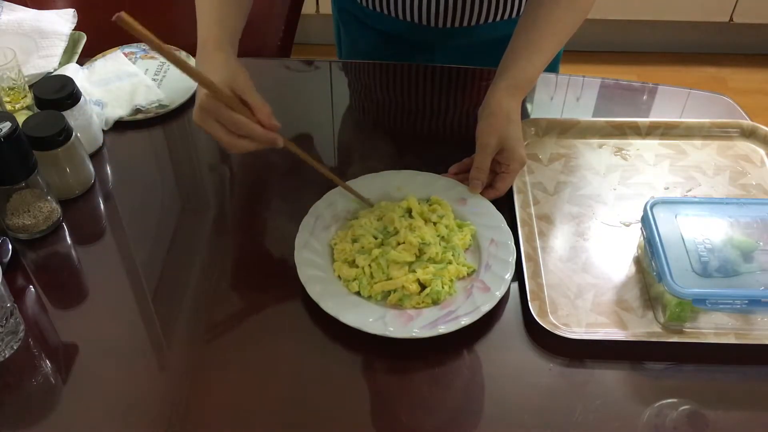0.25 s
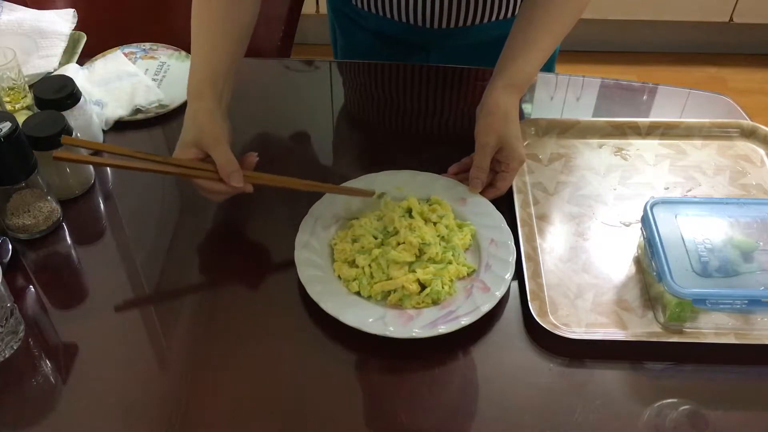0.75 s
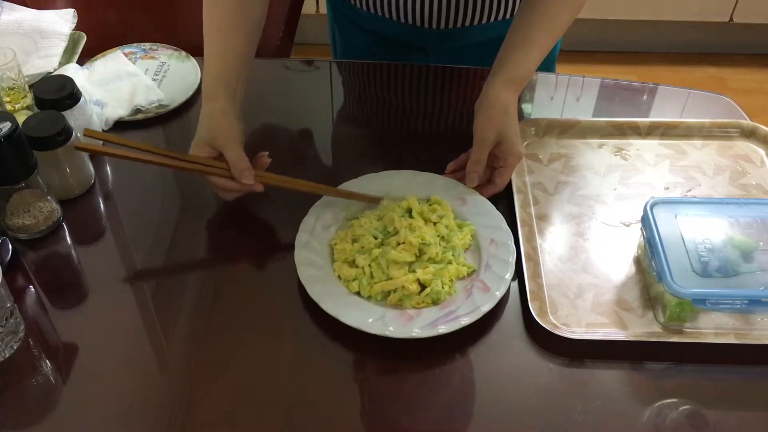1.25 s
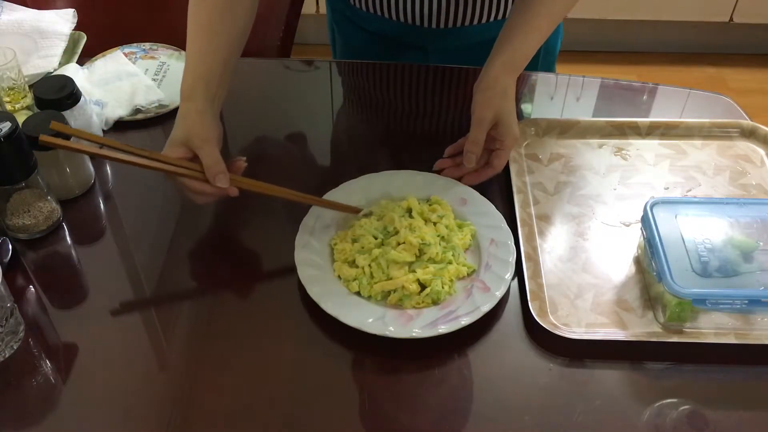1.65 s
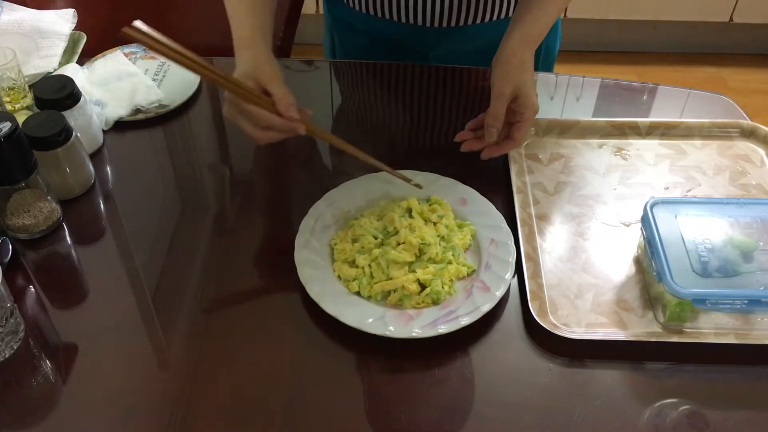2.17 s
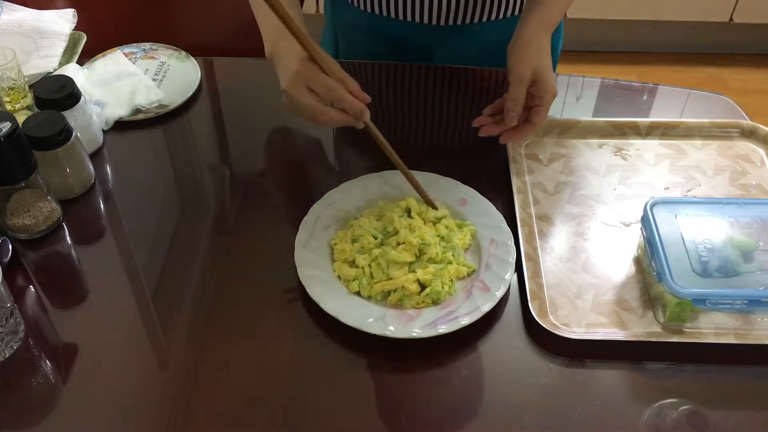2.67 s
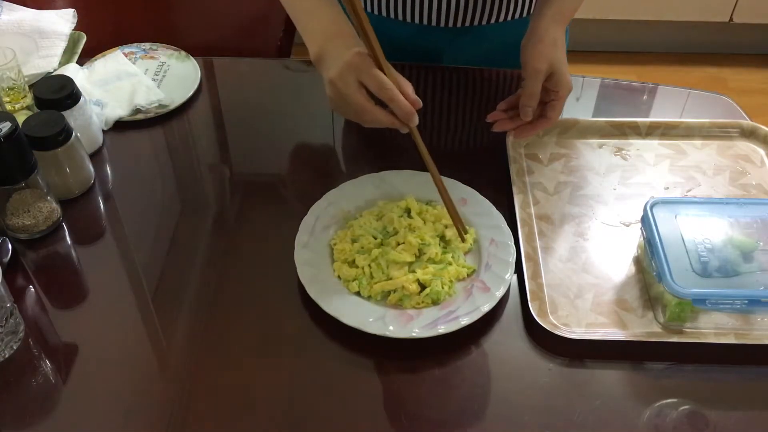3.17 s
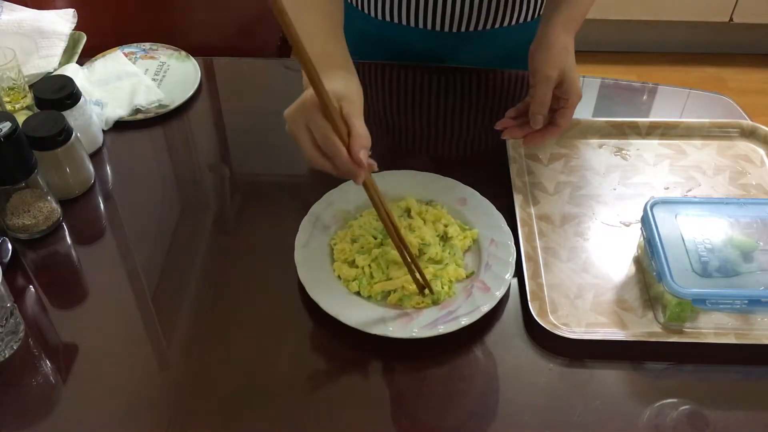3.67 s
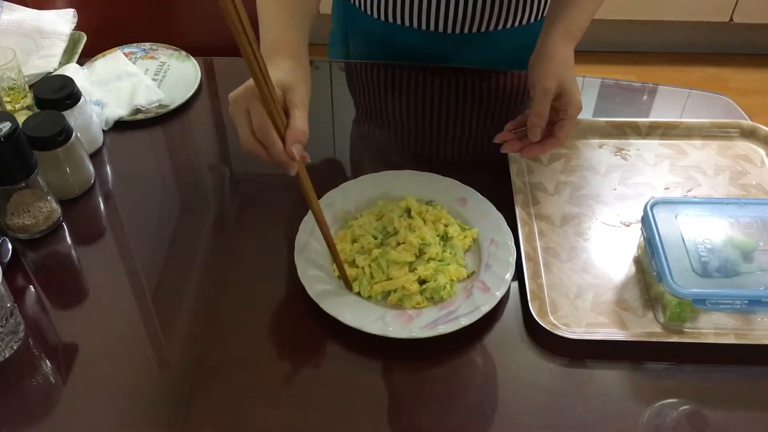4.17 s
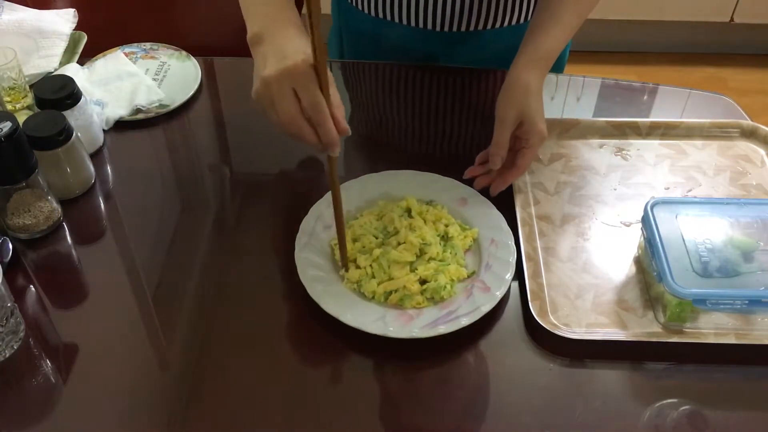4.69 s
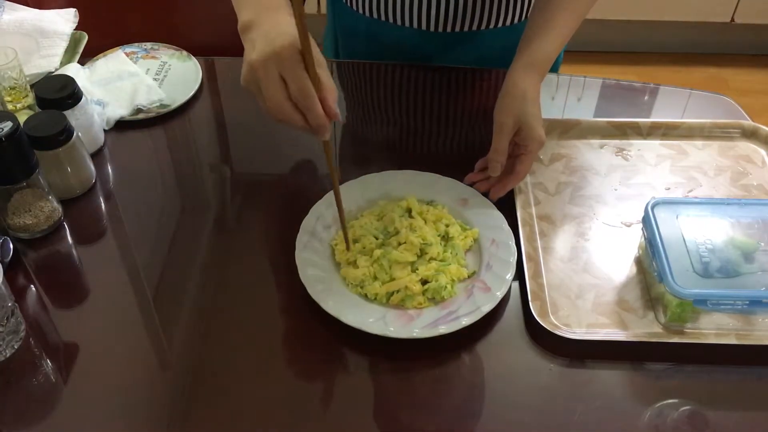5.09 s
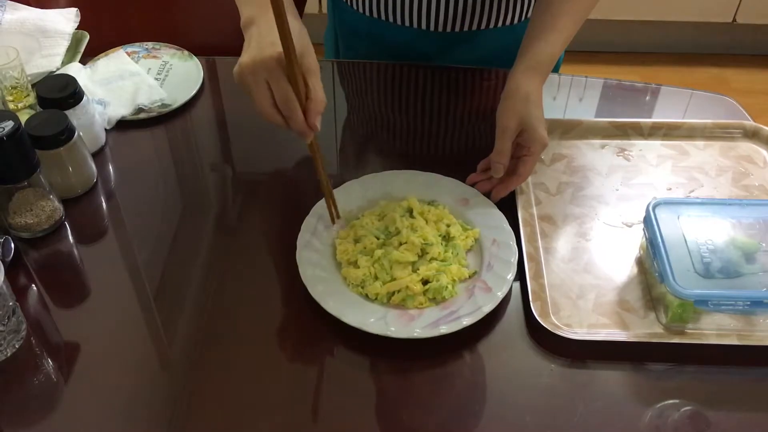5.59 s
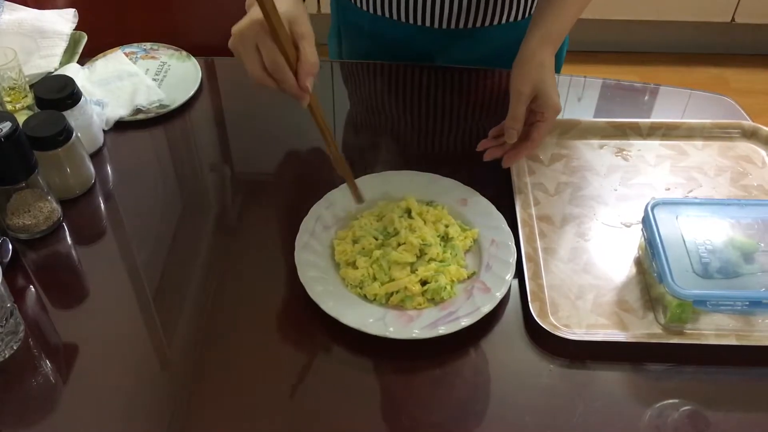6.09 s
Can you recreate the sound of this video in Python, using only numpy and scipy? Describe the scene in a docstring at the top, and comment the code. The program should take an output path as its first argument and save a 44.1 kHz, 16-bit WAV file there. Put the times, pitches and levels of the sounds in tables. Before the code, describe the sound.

Wooden chopsticks tap a ceramic plate of scrambled egg in sharp, briefly ringing clicks, over soft hiss, room air and low appliance hum.

```python
"""Over room air and a low appliance hum, scrambled egg hisses on a ceramic plate: filtered noise and sines.
The gain starts reduced, so this background first creeps up. Wooden chopsticks then push the egg together:
each push swells the hiss slightly and ends in a tap, whose damped modes ring the plate, knock it on the
table and sound the stick, with a filtered-noise click. Ticks fall between, and a small hard room answers.
Loud taps make the recorder's gain drop at once, then recover exponentially."""
import sys
import numpy as np
from scipy import signal
from scipy.fft import rfft, irfft, next_fast_len
from scipy.io import wavfile
from scipy.ndimage import uniform_filter1d, map_coordinates

SR = 44100
rng = np.random.default_rng(int(sys.argv[2]) if len(sys.argv) > 2 else 0)


def store_pcm(level_fs):
    """Save levels as 16-bit WAV."""
    pcm = np.round(np.clip(level_fs, -1, 1) * 32767).astype(np.int16)
    wavfile.write(sys.argv[1], SR, np.atleast_2d(pcm).T)


N = 279838
T = np.arange(SR // 2) / SR  # time since a contact [s]


def amp(db):
    """Logarithmic level: decibels to an amplitude factor."""
    return 10 ** (np.asarray(db) / 20)


def unit(x):
    """Effective value: scale to rms 1."""
    return x / np.sqrt(np.mean(x ** 2) + 1e-20)


def blow(x):
    """Onset level: scale a hit to rms 1 over its first 12 ms."""
    onset = x[:int(0.012 * SR)]
    return x / np.sqrt(np.mean(onset ** 2) + 1e-20)


def along(points, hz):
    """Logarithmic frequency: interpolate (frequency [Hz], value) points on a log axis."""
    point_hz, values = np.transpose(points)
    return np.interp(np.log(hz + 1), np.log(point_hz), values)


def wobble(rate):
    """Slow random modulation: a smooth curve through rate random knots a second."""
    knots = rng.standard_normal(int(N * rate / SR) + 4)
    return map_coordinates(knots, [np.arange(N) * rate / SR])


def filtered(x, response):
    """Linear filtering: multiply the spectrum of x by a response of frequency."""
    size = next_fast_len(len(x) + 8192)
    spectrum = rfft(x, size) * response(np.fft.rfftfreq(size, 1 / SR))
    return irfft(spectrum, size)[:len(x)]


def resonance(f, hz, width):
    """Driven oscillator: causal response of one resonance, with its width in Hz."""
    return 1j * f * width / (hz * hz - f * f + 1j * f * width)


def add(track, s, x):
    """Superposition: mix x into the track at time s."""
    start = round(s * SR)
    track[start:start + len(x)] += x[:N - start]


def burst(t60):
    """Transient excitation: the rough force of a contact, as exponentially decaying noise."""
    return rng.standard_normal(len(T)) * amp(-60 * T / t60)


def puff(hz, width_share, t60):
    """Resonant filtering: a brief noisy snap around one pitch."""
    return blow(filtered(burst(t60), lambda f: resonance(f, hz, hz * width_share) ** 2))


def ring(modes, scatter_db=3.0, attack=0.00057):
    """Modal superposition: damped sines (Hz, dB, t60 s), struck at new strengths and phases each time."""
    x = np.zeros(len(T))
    for hz, db, t60 in modes:
        decay = amp(db + scatter_db * rng.standard_normal() - 60 * T / t60)
        x += decay * np.sin(2 * np.pi * (hz * T + rng.random()))
    return blow(x * (1 - np.exp(-T / attack)))


# Reverberation time of the small hard room: (frequency [Hz], t60 [s])
REVERB_T60 = [(150, 0.1), (600, 0.26), (2000, 0.26), (5000, 0.17), (14000, 0.26)]
# Relative colour of the room's answer: (frequency [Hz], level [dB])
REVERB_COLOUR = [(150, -3), (600, 14), (2000, 3.5), (5000, 6), (14000, 0.5)]


def in_room(x, wet_db, gap=0.0012):
    """Reverberation: convolve with decaying noise, drawn anew for each sound, that builds over gap seconds."""
    hz, t, noise = signal.stft(rng.standard_normal(len(T)), SR, nperseg=256)
    decay_db = -60 * t / along(REVERB_T60, hz)[:, None]
    envelope = amp(along(REVERB_COLOUR, hz)[:, None] + decay_db)
    tail = signal.istft(noise * envelope, SR, nperseg=256)[1][:len(T)]
    tail = tail * (1 - np.exp(-(T / gap) ** 2))
    tail /= np.linalg.norm(tail)
    return x + amp(wet_db) * signal.fftconvolve(x, tail)[:len(x)]


# Relative spectrum of the room air: (frequency [Hz], density [dB per Hz])
AIR_SPECTRUM = [(12, -52), (20, -5), (27, -24), (55, -12), (130, -9.5), (172, 4.5), (210, -3.5), (277, 1.5),
                (499, -6.5), (590, -3.5), (780, -7.5), (2460, -20.5), (6910, -21.5), (13500, -26.5),
                (16000, -37)]
# Partials of the appliance, before HUM_DB and the wobble: (frequency [Hz], level [dB rms])
HUM_PARTIALS = [(59.2, -70.5), (107.7, -72), (183.0, -76.5), (236.9, -65.5), (532.9, -68.5), (592.2, -64.5)]
AIR_DB, HUM_DB = -52.5, 1  # rms level of the air; gain on all hum partials


def kitchen():
    """Stationary noise plus line spectrum: steady room air and an appliance hum wavering in level and phase."""
    air = unit(filtered(rng.standard_normal(N), lambda f: amp(along(AIR_SPECTRUM, f))))
    t = np.arange(N) / SR
    hum = np.zeros(N)
    for hz, db in HUM_PARTIALS:
        level = amp(db + 0.94 * wobble(4.0)) * np.sqrt(2)  # rms to peak
        hum += level * np.sin(2 * np.pi * hz * t + 0.5 * wobble(5))
    return amp(AIR_DB) * air + amp(HUM_DB) * hum


# Chopstick tips meeting the plate: (time [s], strength [dB], click level [dB], spot on the plate)
TIP_TAPS = [(0.2453, -30.5, -25.5, "edge"), (1.027, -25, -32, "back"), (1.2681, -25, -28.5, "back"),
            (1.547, -33.5, -44, "back"), (2.4052, -27.5, -25, "back right"),
            (2.7082, -33, -43.5, "back right"), (3.094, -33.5, -45, "side"), (3.4407, -25, -46, "side"),
            (3.4541, -31.5, -16.5, "edge"), (3.8543, -31, -42, "front"), (4.282, -44, -53, "side"),
            (4.648, -19.5, -62, "left"), (4.9296, -18, -55, "left"), (5.3556, -26.5, -48, "side"),
            (5.695, -22.5, -62, "back left"), (5.999, -23, -40.5, "back left"),
            (6.322, -39.5, -38, "right")]
# Relative spectrum of the egg's hiss: (frequency [Hz], density [dB per Hz])
EGG_SPECTRUM = [(1200, -10), (2500, -1.5), (4500, -3.5), (7500, -8.5), (12000, -11.5), (16000, -16)]
# Clear ticks of the tips against each other and the egg: (time [s], level [dB], pitch [Hz])
CLEAR_TICKS = [(0.7628, -58.5, 8500), (0.9063, -55.5, 4200), (1.741, -50.5, 6500), (2.033, -57, 1960),
               (2.9058, -52.5, 7640), (3.074, -45.5, 6860), (3.48, -38, 6260), (4.0082, -58.5, 5960),
               (4.624, -56.5, 4970), (4.7018, -46.5, 6700)]
EGG_DB, PUSH_DB = -63, 0.5  # mean hiss level between pushes; its swell during one
PUSH_LEAD_S, PUSH_WIDTH_S = 0.1, 0.092  # a push peaks this long before its tap; its half-width at 1/e
WET_TICK_DB, WET_TICK_RANGE_DB = -0.5, 4.5  # faintest wet tick against the hiss; how much louder one can be


def egg(count=40):
    """Modulated noise: hiss swelling in each push, with clear ticks and many tiny wet ones as noise bursts."""
    hiss = unit(filtered(rng.standard_normal(N), lambda f: amp(along(EGG_SPECTRUM, f))))
    t = np.arange(N) / SR
    pushes = [np.exp(-((t - s + PUSH_LEAD_S) / PUSH_WIDTH_S) ** 2) for s, *_ in TIP_TAPS]
    push = np.max(pushes, axis=0)
    level_db = EGG_DB + PUSH_DB * push + 0.8 * wobble(6.95)
    out = amp(level_db + 0.74 * wobble(28)) * hiss
    for s, db, hz in CLEAR_TICKS:
        tick = puff(hz, width_share=0.35, t60=0.0061)
        add(out, s, amp(db) * in_room(tick, wet_db=-10))
    for when, size, pitch in rng.random((count, 3)):
        db = level_db[int(when * N)] + WET_TICK_DB + WET_TICK_RANGE_DB * size ** 2
        wet_tick = puff(3000 * 2.8 ** pitch, width_share=0.45, t60=0.0084)
        add(out, when * (N - 1) / SR, amp(db) * wet_tick)
    return out


# Main modes of the loaded plate, each with a weak twin that the food damps less:
# (frequency [Hz], t60 [s], twin frequency [Hz], twin level [dB])
PLATE_MODES = [(1158, 0.023, 1120, -24), (1731, 0.041, 1675, -19.5), (2777, 0.046, 2748, -20.5),
               (3849, 0.038, 3842, -28.5), (4987, 0.026, 4953, -22.5)]


def plate_ring(mode_db, twin_t60=0.22):
    """Split modes: each plate mode and its slower-decaying twin sound at the level set by the spot."""
    pairs = []
    for hz, t60, twin_hz, twin_db in PLATE_MODES:
        pairs.append(ring([(hz, 0, t60), (twin_hz, twin_db, twin_t60)], scatter_db=2.0))
    return amp(mode_db) @ np.array(pairs)


# Overtones of the free rim: (frequency [Hz], relative level [dB], t60 [s])
RIM_MODES = [(6163, 21.5, 0.23), (7470, 14, 0.11), (8950, 9, .15)]


def rim_ring():
    """Light damping: the overtones of the free rim build gently and ring on."""
    return ring(RIM_MODES, scatter_db=5.5, attack=0.0023)


# Plate rocking on the table: (frequency [Hz], relative level [dB], t60 [s])
TABLE_MODES = [(139.3, -10, 0.091), (328, -6.5, 0.029), (438, -1.5, 0.018), (696, -7.5, 0.059),
               (1000, -9, 0.017)]


def table_knock(knock_hz):
    """Structural coupling: the rocking modes, one mode of the spot and a noisy thud."""
    thud = amp(-6) * puff(720, width_share=1.2, t60=0.045)
    return ring(TABLE_MODES + [(knock_hz, 2, 0.048)], scatter_db=2.5, attack=0.0001) + thud


# Bending modes of a stick damped by the fingers: (frequency [Hz], relative level [dB], t60 [s])
STICK_MODES = [(1961, -3.5, 0.022), (2140, -2.5, 0.015), (2420, -3, 0.008), (2972, 2.5, 0.0076),
               (4480, -11, 0.0078)]


def stick_tock():
    """Bending vibration: strongly damped stick modes with a noisy scuff."""
    scuff = amp(-9) * puff(2600, width_share=1.2, t60=0.02)
    return ring(STICK_MODES, scatter_db=2.5, attack=0.00037) + scuff


# Resonances of the contact click: (frequency [Hz], width [Hz], relative level [dB])
CLICK_RESONANCES = [(2650, 490, 4.5), (4450, 330, 3), (5440, 380, 3.5), (6340, 450, 5.5), (7600, 640, 4),
                    (8860, 350, 0.5), (9960, 670, 2), (12000, 1160, 1.5), (14000, 2100, -7.5)]
SOFT_CLICK_HZ, FIRM_CLICK_DB = 4930, -23.5  # cutoff of the gentlest click; level at which it doubles
BRIGHTENING = 1.26  # power by which brightness grows with the click's force


def click(click_db):
    """Contact stiffening: dry wood on glaze; a firmer contact is shorter and so brighter."""
    bright_hz = SOFT_CLICK_HZ * (1 + amp(click_db - FIRM_CLICK_DB) ** BRIGHTENING)
    lowpass = signal.butter(2, min(bright_hz, SR * 0.45), fs=SR, output="sos")
    force = signal.sosfilt(lowpass, burst(0.009))

    def wood(f):
        # alternate signs between neighbouring resonances
        return sum((-1) ** k * amp(db) * resonance(f, hz, width)
                   for k, (hz, width, db) in enumerate(CLICK_RESONANCES))

    return blow(filtered(force, wood))


# How the plate answers at each named spot, levels relative to the tap's strength:
# (knock frequency [Hz], knock level [dB], stick level [dB], rim level [dB], five main mode levels [dB])
PLATE_SPOTS = {"edge": (550, -12, -1.5, -21, (-17.5, -2.5, -19, -11, -27)),
               "back": (542, -13.5, -9.5, -32, (-19.5, -9.5, -8.5, -1.5, -13.5)),
               "back right": (467, -11, -4, -22.5, (-14, -10, -12.5, -3.5, -8)),
               "right": (570, -20, -15, -16, (-26, -23, 1.5, -31, -15)),
               "side": (490, -12, -4.5, -33, (-11.5, -14.5, -4, -6, -11)),
               "front": (725, -7, -8.5, -29, (-39, -18, -0.5, -8.5, -11)),
               "left": (602, -12.5, -7, -23.5, (-10.5, -6, 0, -2, -18.5)),
               "back left": (583, -18, -5, -26.5, (-16, -13.5, -7, -1.5, -13.5))}


def taps(bite=0.0005):
    """Impact excitation: one blow sounds plate, rim, table and stick, then a click after bite seconds."""
    out = np.zeros(N)
    for s, db, click_db, spot in TIP_TAPS:
        knock_hz, knock_db, stick_db, rim_db, mode_db = PLATE_SPOTS[spot]
        plate = in_room(plate_ring(mode_db), wet_db=-11)
        rim = amp(rim_db) * rim_ring()
        add(out, s, amp(db) * (plate + rim))
        knock = amp(knock_db) * table_knock(knock_hz)
        stick = amp(stick_db) * stick_tock()
        add(out, s, amp(db) * in_room(knock + stick, wet_db=-10.5))
        # the click comes as the tip bites through the film of egg
        add(out, s + bite, amp(click_db) * in_room(click(click_db), wet_db=-11.5))
    return out


GAIN_THRESHOLD_DB, GAIN_SLOPE = -30, 0.36  # level above which the gain drops; dB of cut per dB above it
GAIN_RECOVERY_S, START_CUT_DB = 0.47, 6.5  # time constant of the recovery; cut in force at the start


def gain_control(x, size=44):
    """Compression: loud sound (level over size samples) cuts the gain at once; the cut decays exponentially."""
    level_db = 10 * np.log10(np.abs(uniform_filter1d(x ** 2, size)) + 1e-12)
    needed_db = GAIN_SLOPE * np.maximum(level_db - GAIN_THRESHOLD_DB, 0)
    needed_db[0] = START_CUT_DB
    fade = np.exp(-np.arange(N) / SR / GAIN_RECOVERY_S)
    # a running maximum of cut / fade keeps the largest cut that is still decaying
    cut_db = np.maximum.accumulate(needed_db / fade) * fade
    return x * amp(-uniform_filter1d(cut_db, size))


def scene():
    """Superposition: kitchen, egg and taps at one microphone above the table."""
    return (kitchen() + egg() + taps())[None]


TOP_HZ = 16000  # band limit of the recorder


def record(dry):
    """Compression, saturation and band limiting: the recorder rides its gain and rounds the highest peaks."""
    x = gain_control(dry[0])
    rounded = x / (1 + np.abs(x / 0.23) ** 6) ** (1 / 6)  # peaks approach 0.23 of full scale
    return filtered(rounded, lambda f: f < TOP_HZ)[None]


dry = scene()
out = record(dry)
store_pcm(out)
```